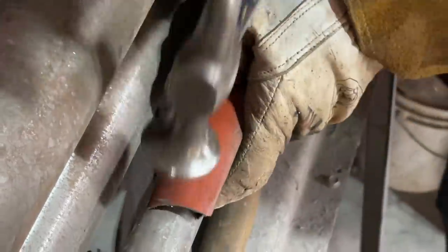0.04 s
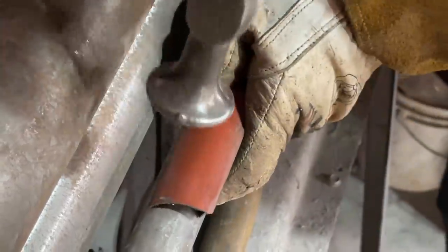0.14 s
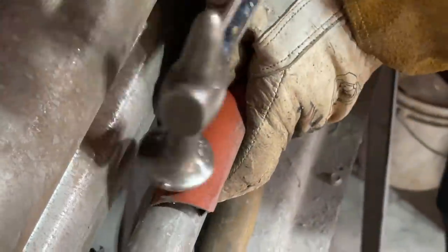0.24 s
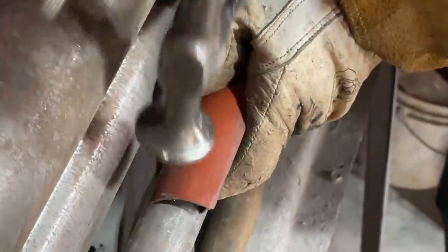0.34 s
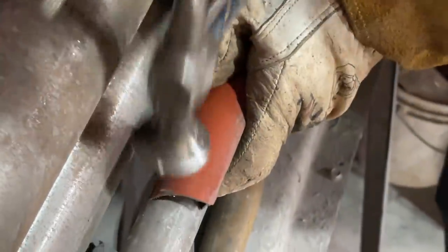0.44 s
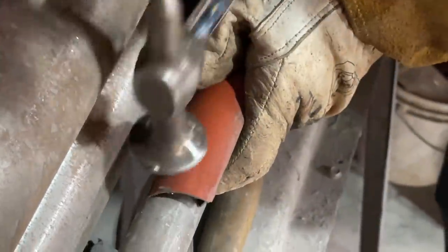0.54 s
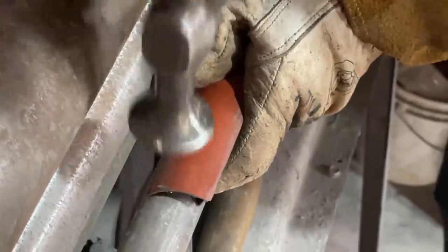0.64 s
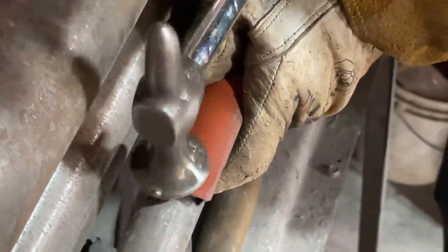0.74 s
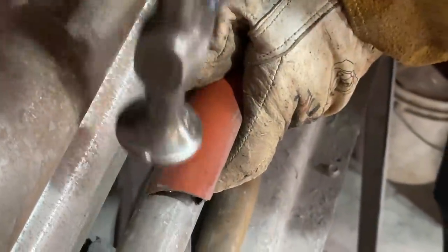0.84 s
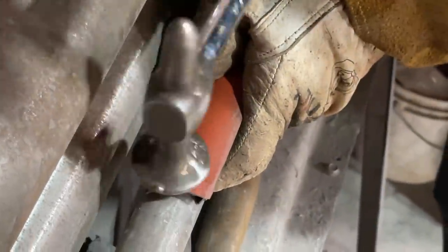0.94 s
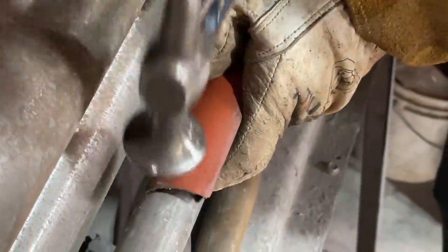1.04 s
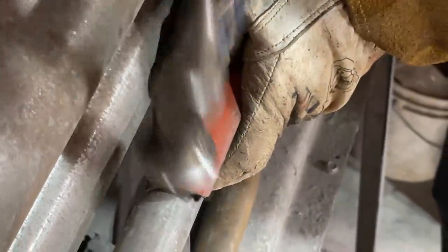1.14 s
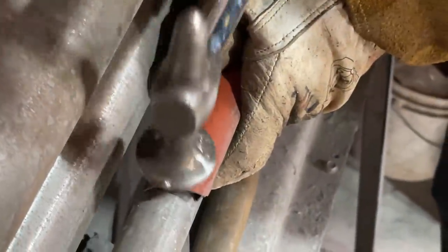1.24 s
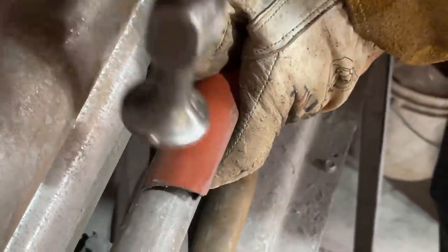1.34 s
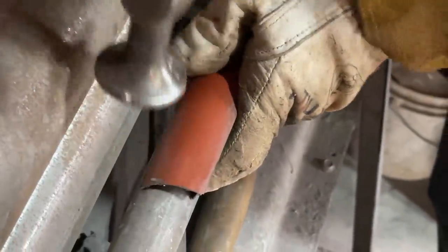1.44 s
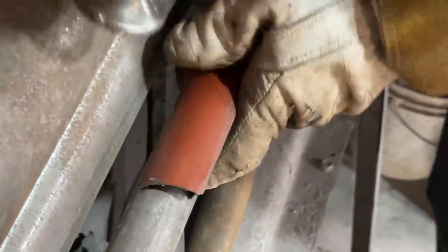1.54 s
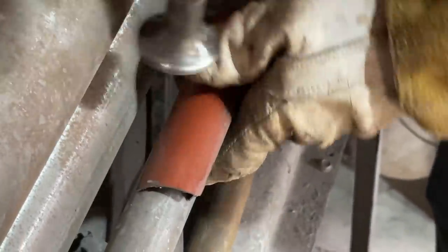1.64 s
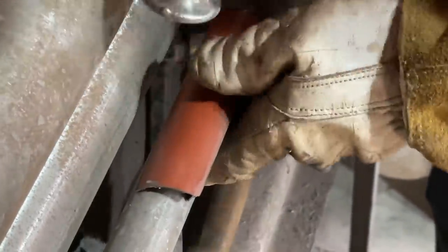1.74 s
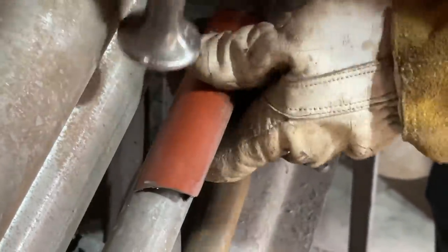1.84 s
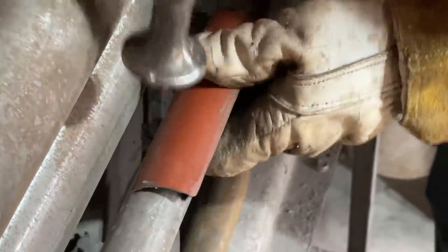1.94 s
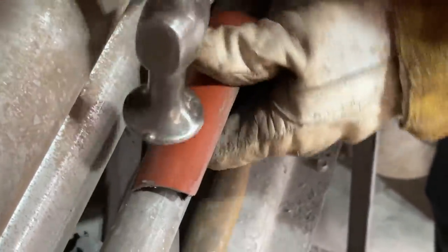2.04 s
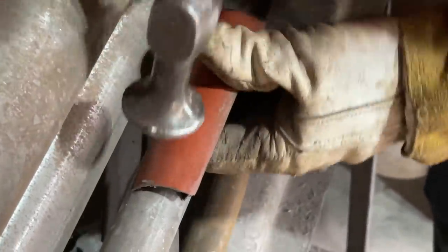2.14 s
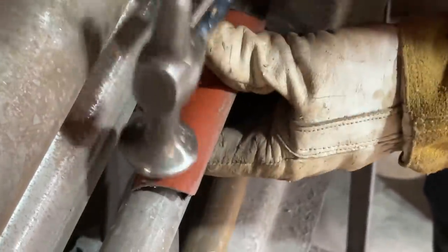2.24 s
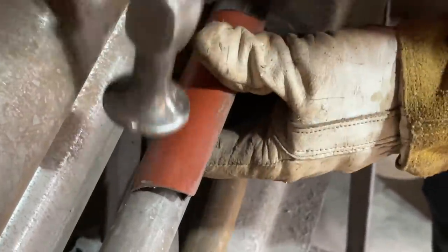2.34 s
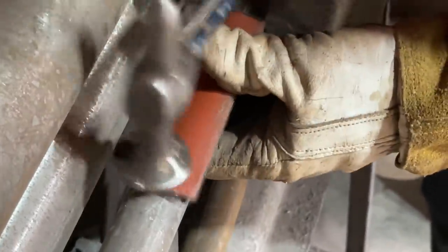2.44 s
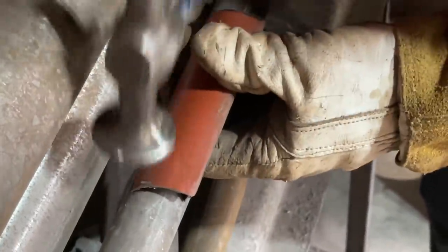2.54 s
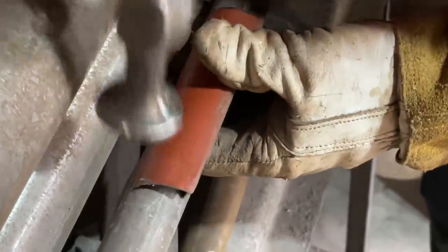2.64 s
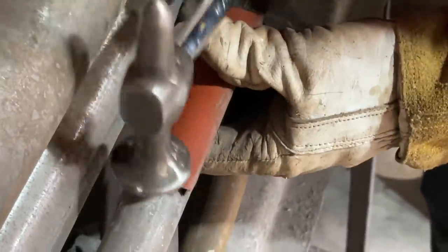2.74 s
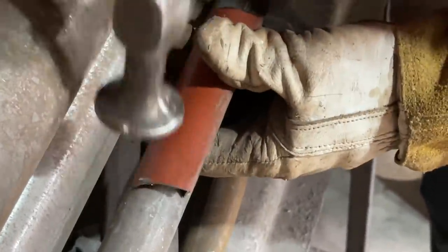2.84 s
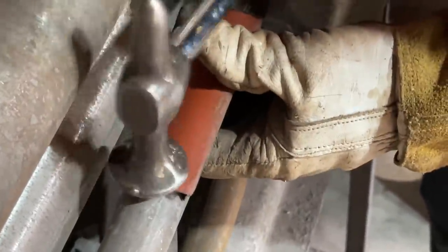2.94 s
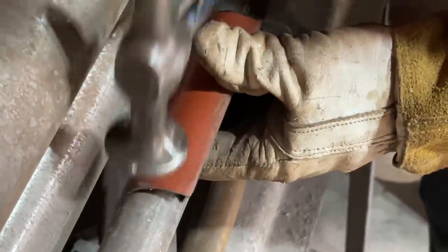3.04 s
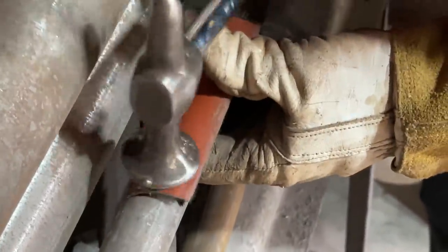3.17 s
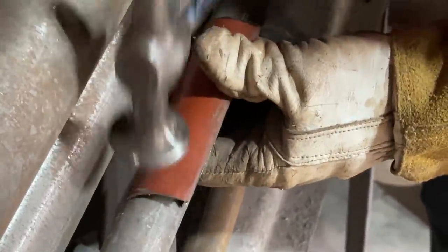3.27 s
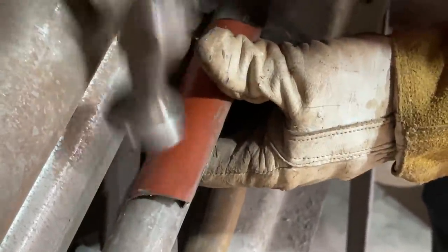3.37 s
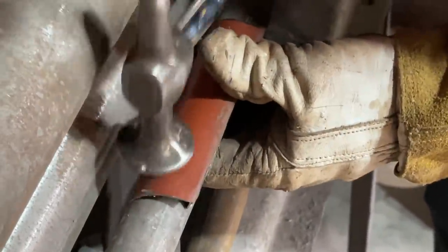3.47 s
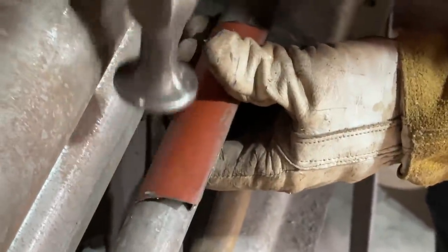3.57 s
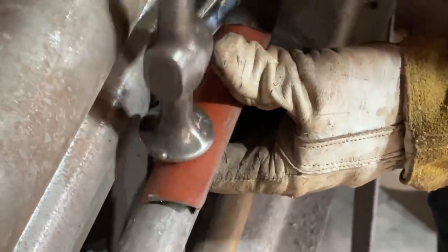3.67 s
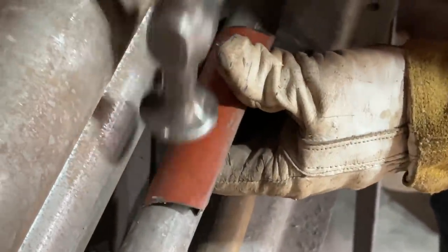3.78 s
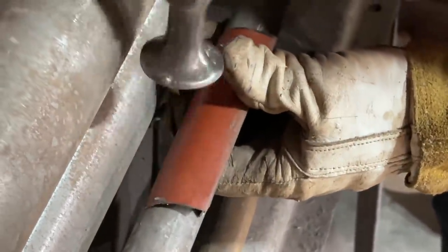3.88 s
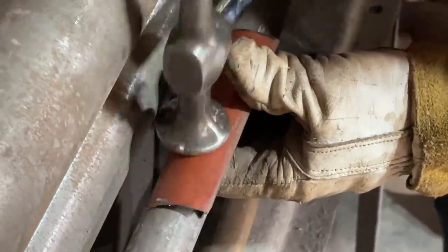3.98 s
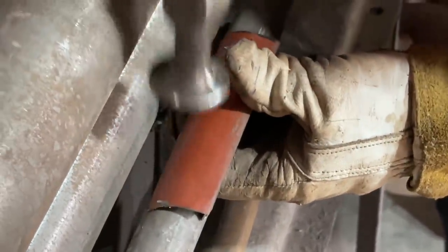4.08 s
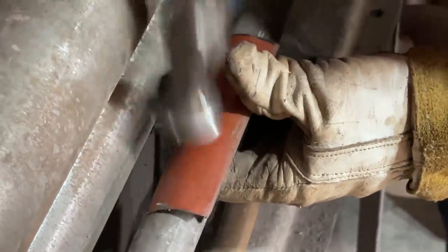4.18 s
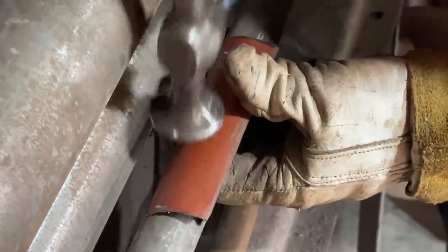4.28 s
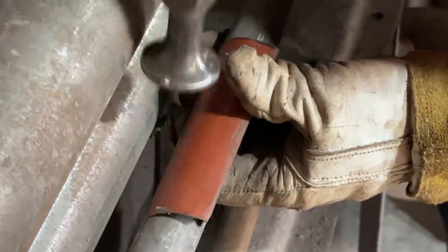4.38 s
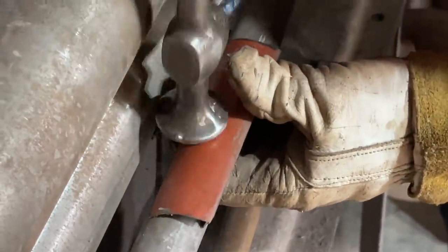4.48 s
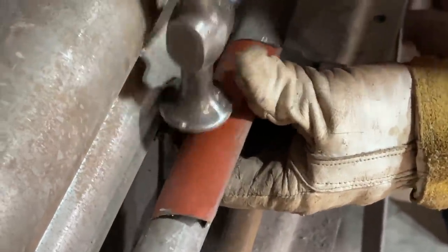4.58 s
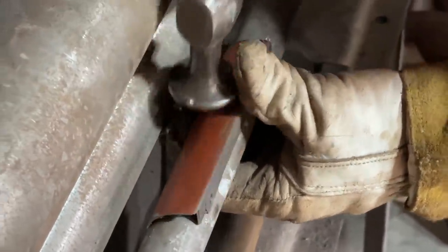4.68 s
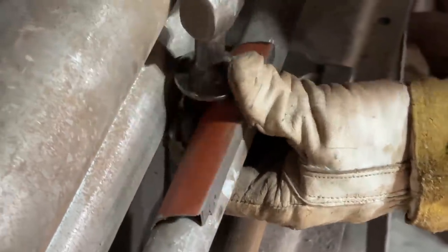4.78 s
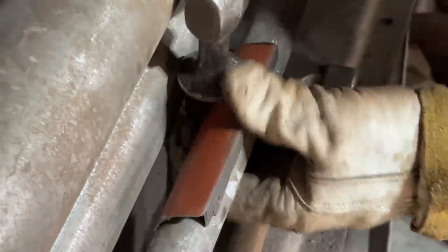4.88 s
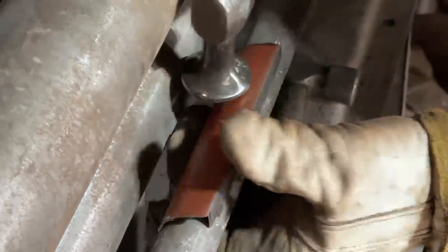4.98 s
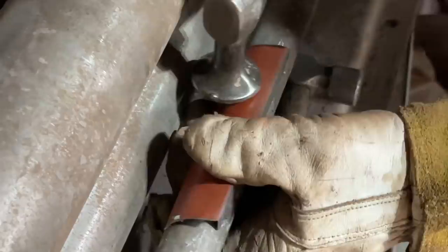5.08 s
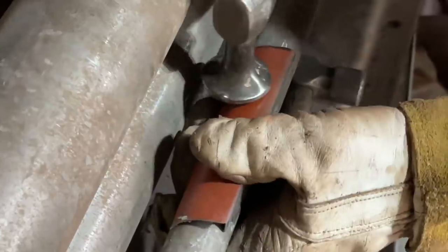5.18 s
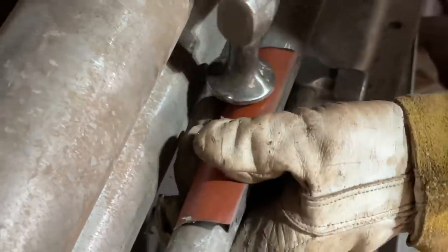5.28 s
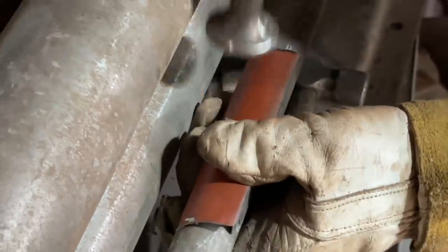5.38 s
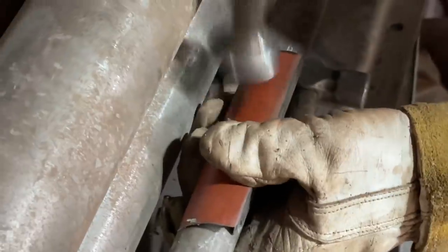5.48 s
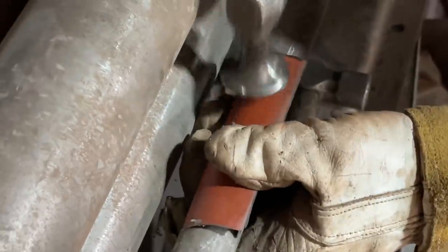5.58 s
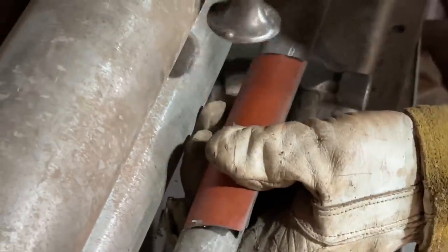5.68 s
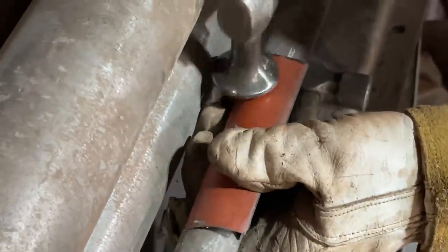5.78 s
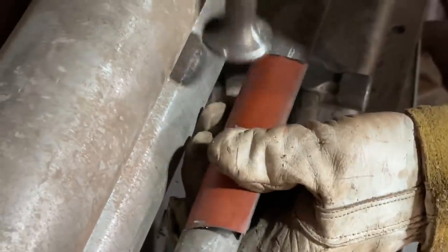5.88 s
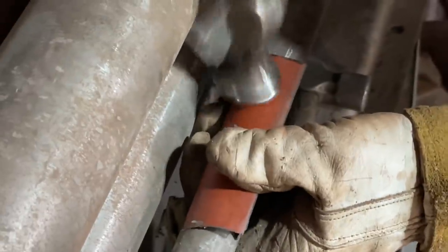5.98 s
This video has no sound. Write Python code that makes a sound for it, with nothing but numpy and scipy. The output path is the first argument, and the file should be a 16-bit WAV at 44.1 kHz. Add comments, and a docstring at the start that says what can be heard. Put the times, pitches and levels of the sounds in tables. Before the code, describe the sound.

A hammer strikes a hand-held steel strip on a steel pipe, about four hard, clanky blows a second. After six blows the glove rustles and the strip ticks during a one-second pause; ten brighter, louder blows follow, then a weak tap, a quieter gap and three final blows. Close microphone, short diffuse workshop echo, dull air bumps and faint hiss.

```python
"""Sharp metallic blows ring out in groups, with pauses between: a hammer taps a curved steel strip onto a steel pipe.
Each blow excites damped modes of the hand-held strip, sets the pipe humming and jolts the frame under it.
The workshop answers with diffuse echoes made of decaying noise. A leather glove shifts the strip: ticks and
rustle. Dull puffs of air bump the microphone, over low buffeting and a faint hiss; overload squashes the peaks."""
import sys
import numpy as np
from scipy import signal
from scipy.fft import rfft, irfft, next_fast_len
from scipy.io import wavfile
from scipy.ndimage import map_coordinates

SR = 44100
rng = np.random.default_rng(int(sys.argv[2]) if len(sys.argv) > 2 else 0)


def generate_wav(signal):
    """Clip the signal to [-1, 1] and save it as 16-bit WAV at the path in sys.argv[1]."""
    frames = np.transpose(np.atleast_2d(signal))
    scaled = np.clip(frames, -1, 1) * 32767
    pcm = np.round(scaled).astype(np.int16)
    wavfile.write(sys.argv[1], SR, pcm)


N = 265261

# Blows; grip and strike point move three strip modes and share out the energy. Each row: start in seconds,
# first, third and sixth mode in Hz, levels in dB of the first, second, third and upper modes, rebound in dB
# relative to the blow, then levels in dB of the frame, the pipe and the puff of air.
BLOWS = [(-0.015, 1722, 4690, 8760, -22, -24.5, -25.5, -27, -4, -34, -49.5, -42),
         (0.222, 1770, 4100, 8300, -16, -14, -25, -21.5, -12, -23.5, -34, -37),
         (0.46, 1370, 4390, 8320, -23.5, -18, -25.5, -21, -20, -26, -34.5, -40.5),
         (0.695, 1100, 3640, 8670, -25, -19.5, -37, -31, -14, -30.5, -35.5, -35.5),
         (0.926, 1194, 3830, 8770, -20, -17, -24.5, -25.5, -16, -27, -34, -34.5),
         (1.158, 1340, 3890, 9170, -18.5, -19.5, -29.5, -24.5, -14, -26, -33.5, -36.5),
         (2.219, 1940, 4170, 8080, -18.5, -28.5, -28.5, -24.5, -18, -33, -43, -54.5),
         (2.442, 1810, 4240, 8350, -15, -18, -19.5, -16.5, -15.5, -25, -32, -46),
         (2.693, 1830, 4080, 8270, -13, -19.5, -17.5, -19, -15.5, -25, -36, -42.5),
         (2.932, 1830, 4080, 8630, -12.5, -20, -16.5, -16, -18.5, -22.5, -34, -44),
         (3.174, 1650, 3900, 8340, -13, -18, -23, -14, -19.5, -23, -35, -44),
         (3.408, 1450, 3980, 8740, -19, -23.5, -15.5, -13, -18.5, -20.5, -30.5, -42.5),
         (3.655, 1316, 3820, 9000, -13.5, -24, -14.5, -16.5, -13, -20, -35, -46),
         (3.955, 1390, 4210, 8300, -16, -18, -15, -17.5, -15.5, -19.5, -34.5, -40.5),
         (4.195, 1740, 4220, 8470, -15.5, -21.5, -13.5, -14.5, -16.5, -17.5, -34.5, -43.5),
         (4.43, 1870, 4230, 8200, -15.5, -22, -11, -16, -9, -18.5, -35, -42),
         (4.748, 1700, 4260, 8100, -30, -32, -39.5, -42, -9, -40.5, -70, -56),
         (5.506, 1856, 3800, 8270, -15.5, -19, -15, -15.5, -13.5, -21.5, -39.5, -42.5),
         (5.745, 1900, 4260, 8140, -24, -18, -15, -15, -18, -15.5, -40, -46),
         (5.991, 1650, 4410, 8300, -20.5, -20, -19.5, -18.5, -22, -15.5, -53, -52)]
# Energy of a sound whose rms is 1 over 1/60 s, as an amplitude: it turns a blow's levels into such rms levels.
BLOW_SIZE = np.sqrt(SR / 60)


def amp(db):
    """Decibels to amplitude ratio: 20 dB is a factor of ten."""
    return 10 ** (np.asarray(db) / 20)


def unit(x):
    """Normalisation to an rms of 1."""
    return x / np.sqrt(np.mean(x ** 2) + 1e-20)


def along(points, hz):
    """Interpolation of (Hz, value) points on a logarithmic frequency axis."""
    f, v = np.transpose(points)
    return np.interp(np.log(hz + 1), np.log(f + 1), v)


def curve(rows):
    """Linear interpolation of (seconds, value) rows, one value per sample."""
    return np.interp(np.arange(N) / SR, *np.transpose(rows))


def wobble(rate):
    """Slow random modulation: a smooth curve through `rate` random knots a second."""
    knots = rng.standard_normal(int(N * rate / SR) + 4)
    return map_coordinates(knots, [np.arange(N) * rate / SR])


def filtered(x, response):
    """Linear filtering: the spectrum of x times a complex response of frequency."""
    m = next_fast_len(x.shape[-1] + 8192)  # padding keeps the tail from wrapping round
    spectrum = rfft(x, m) * response(np.fft.rfftfreq(m, 1 / SR))
    return irfft(spectrum, m)[..., :x.shape[-1]]


def noise(spectrum):
    """Coloured noise: white noise shaped by a (Hz, dB) spectrum, at rms 1."""
    return unit(filtered(rng.standard_normal(N), lambda hz: amp(along(spectrum, hz))))


def resonance(x, hz, width_hz, order=1):
    """Damped oscillator driven by x (order 2: steeper flanks), scaled to energy 1."""
    def response(f):
        damping = 1j * f * width_hz
        return (damping / (hz * hz - f * f + damping)) ** order

    y = filtered(x, response)
    return y / np.linalg.norm(y)


def add(track, s, sound):
    """Superposition: mix a sound into the track at s seconds, cut at both ends."""
    i = round(s * SR)
    part = sound[max(-i, 0):max(len(track) - i, 0)]
    track[max(i, 0):][:len(part)] += part


def echoes(colour, slow):
    """Diffuse reverberation: fresh noise of energy 1 in which each frequency decays at its own rate."""
    # Each row: frequency in Hz, relative decay time, which times `slow` gives the seconds to fall 60 dB.
    decay = [(200, 0.55), (700, 1), (1800, 0.84), (4500, 0.52), (8000, 0.46), (12000, 0.34), (14000, 0.26),
             (16000, 0.34)]
    hz, t, z = signal.stft(rng.standard_normal(SR * 3 // 4), SR, nperseg=256)
    t60 = slow * along(decay, hz)[:, None]
    level_db = along(colour, hz)[:, None] - 60 * t / t60
    tail = signal.istft(z * amp(level_db), SR, nperseg=256)[1]
    return tail / np.linalg.norm(tail)


def hiss():
    """Steady broadband noise: the quiet shop."""
    # Each row: frequency in Hz, relative level in dB per Hz.
    air = [(150, -5.5), (400, 1), (1000, -8.5), (2000, -6.5), (4000, -11.5), (8000, -15.5), (11000, -19.5),
           (16000, -23.5)]
    return amp(-68.5) * noise(air)


def buffeting():
    """Turbulent air and handling at the microphone: low noise that swells after every blow."""
    # Level between puffs. Each row: time in seconds, level in dB.
    rumble = [(0, -55), (1.37, -50.5), (1.54, -45), (1.69, -47), (1.77, -56.5), (2.2, -52.5), (4.65, -57.5),
              (4.99, -48), (5.06, -62), (5.24, -54), (6.01, -53)]
    # Its spectrum. Each row: frequency in Hz, relative level in dB per Hz.
    low = [(15, -4), (30, -0.5), (70, -7.5), (120, -20.5), (200, -98.5)]
    puff_s = 0.05  # the pushed air peaks at the microphone this long after a blow
    level = amp(curve(rumble))
    u = np.arange(SR // 2) / SR / puff_s
    for s, *_, puff_db in BLOWS:
        add(level, s, amp(puff_db) * (u * np.exp(1 - u)) ** 2)
    return level * unit(amp(4.4 * wobble(9.2)) * noise(low))


def air_bumps():
    """Low-frequency pressure pulses: each dull puff of air bumps the microphone for about one cycle."""
    # Each row: start in seconds, approximate peak level in dB, frequency in Hz.
    bumps = [(1.323, -43, 248), (1.508, -37, 103), (1.526, -31, 65), (1.653, -32.5, 199), (1.736, -37, 147),
             (2.377, -25.5, 105), (3.83, -30, 232), (4.631, -26, 128), (4.874, -24.5, 124),
             (4.918, -33.5, 202), (4.965, -30, 115), (5.37, -50.5, 149.7)]
    out, t = np.zeros(N), np.arange(SR // 10) / SR
    for s, db, hz in bumps:
        cycles = hz * t
        swell = cycles * np.exp(-1.2 * cycles ** 2)
        # 7.5 dB makes up for the low peak of the swell
        add(out, s, amp(db + 7.5) * swell * np.sin(2 * np.pi * (cycles + 0.037)))
    return out


def leather_rub():
    """Friction noise: leather dragged over metal slips in uneven grains, in a dull and a bright band."""
    # Steady dull rub. Each row: time in seconds, level in dB.
    shuffle = [(0, -56), (.89, -54), (1.4, -51), (1.76, -63.5), (1.82, -68.5), (2.2, -62), (2.35, -59.5),
               (3.3, -56), (4.4, -57), (5.0, -62.5), (5.07, -68), (6.01, -60.5)]
    # Strokes. Each row: middle in seconds, half length in seconds, dull level in dB, bright level in dB.
    strokes = [(1.482, 0.045, -41, -68), (1.576, 0.028, -53, -62), (1.658, 0.026, -44, -73),
               (1.733, 0.029, -51.5, -78), (1.999, .07, -70, -69), (2.38, 0.043, -58, -82),
               (3.814, .04, -53, -78), (4.615, 0.036, -47, -54), (4.688, 0.018, -58, -56),
               (4.795, 0.023, -58, -60), (4.943, 0.054, -57, -59), (5.051, .025, -74, -60.5),
               (5.125, 0.027, -68, -67), (5.35, .04, -72, -80)]
    # Spectra of the two bands. Each row: frequency in Hz, relative level in dB per Hz.
    dull_colour = [(50, -33), (110, 4), (250, -0.5), (600, -8.5), (1500, -21), (4000, -36.5), (8000, -68.5)]
    bright_colour = [(800, -20.5), (2500, -1), (5000, -7.5), (7500, -4), (10000, -14), (12500, -23.5),
                     (16000, -26.5)]
    rest_db = -77.5  # bright band between strokes
    middle, half, dull_db, bright_db = np.transpose(strokes)
    swells = np.exp(-((np.arange(N)[:, None] / SR - middle) / half) ** 2)
    dull_grains = unit(amp(2.5 * wobble(40) + 3 * wobble(200)) * noise(dull_colour))
    bright_grains = unit(amp(2.5 * wobble(60)) * noise(bright_colour))
    dull = (amp(curve(shuffle)) + swells @ amp(dull_db)) * dull_grains
    bright = (amp(rest_db) + swells @ amp(bright_db)) * bright_grains
    return dull + bright


def strip_ticks():
    """Broad resonances struck lightly: the strip ticks on the pipe, and damping ends each tick at once."""
    # Each row: start in seconds, peak level in dB, frequency in Hz, width in Hz.
    ticks = [(1.422, -45, 6260, 2530), (1.473, -40, 1500, 2000), (1.484, -39, 880, 1500),
             (1.522, -40, 1190, 1500), (1.578, -44, 4500, 1000), (1.654, -42, 890, 2500),
             (1.71, -55, 4930, 1010), (1.737, -47, 1480, 4950), (1.76, -54, 5500, 3030),
             (1.8875, -35.5, 5370, 2500), (1.965, -46, 5980, 3470), (1.971, -48, 7000, 3460),
             (1.991, -45, 950, 600), (1.993, -40.5, 3070, 1505), (1.995, -52, 7000, 1980),
             (2.022, -32.5, 4400, 1990), (2.038, -33.5, 2410, 2950), (2.078, -51, 2400, 1200),
             (2.089, -48, 2200, 968), (2.0895, -51, 4400, 1510), (2.187, -57.5, 3500, 2500),
             (4.874, -39, 700, 905), (4.965, -50, 700, 904), (5.053, -43.5, 7500, 2500),
             (5.345, -56, 4940, 1196)]
    out, t = np.zeros(N), np.arange(SR // 10) / SR
    for s, db, hz, width_hz in ticks:
        contact = amp(-60 * t / 0.0024) * rng.standard_normal(len(t))
        tick = resonance(contact, hz, width_hz, order=2)
        add(out, s, amp(db) * tick / np.abs(tick).max())
    return out


def frame_clang():
    """High modal density: the frame's many modes merge into decaying noise, with the bench's jolt below."""
    # Spectra of frame and bench. Each row: frequency in Hz, relative level in dB per Hz.
    clang_colour = [(150, -11), (300, -4.5), (500, 3.5), (750, 3), (1200, 1.5), (2500, 5), (5000, -7)]
    thud_colour = [(60, -26.5), (110, -3.5), (200, -0.5), (330, -13.5), (600, -30)]
    out = np.zeros(N)
    for s, *_, frame_db, _, _ in BLOWS:
        clang = echoes(clang_colour, slow=0.61) + amp(-16) * echoes(thud_colour, slow=0.23)
        onset = 1 - np.exp(-np.arange(len(clang)) / SR / 0.011)
        add(out, s, amp(frame_db) * BLOW_SIZE * clang * onset)
    return out


def pipe_hum():
    """Modal superposition: decaying sinusoids whose strengths shift as the strike point travels along the pipe."""
    # Long modes of the pipe. Each row: frequency in Hz, relative level in dB, time to fall 60 dB in seconds,
    # change of level in dB per second of the scene.
    pipe = [(352.6, -17.5, 0.99, 2), (533, -6.5, 0.32, -3), (634, -23.5, 1, 3.5), (698, -10.5, 0.14, 3.5),
            (811, -7.5, 0.76, 0.5), (971, -9, 0.91, 0), (1073, -13.5, 0.61, 1.5), (1340, -8, .5, 1.5),
            (1390, -18.5, 0.69, 4)]
    # Two faint modes that hang on, same columns.
    linger = [(638, -58, 2.5, 3.5), (4790, -74, 2.5, 3.5)]
    linger_db = -18  # added to the lingering modes, whatever the blow
    out, t = np.zeros(N), np.arange(SR * 3 // 2) / SR
    hz, mode_db, t60, travel_db = np.transpose(pipe + linger)
    decay = amp(mode_db[:, None] - 60 * t / t60[:, None])
    rings = decay * np.exp(2j * np.pi * hz[:, None] * t) * (1 - np.exp(-t / 0.0062))
    for s, *_, pipe_db, _ in BLOWS:
        phases = np.exp(2j * np.pi * rng.random(len(rings)))
        strengths = amp(travel_db * s + rng.normal(0, 0.43, len(rings))) * phases
        strengths *= amp([pipe_db] * len(pipe) + [linger_db] * len(linger))
        add(out, s, np.real(strengths @ rings))
    return out


def chatter(u, t60):
    """Repeated contact: envelope of a force that rises fast from u = 0 and falls 60 dB in t60 seconds."""
    return (u >= 0) * (1 - np.exp(-np.abs(u) / 0.00033)) * amp(-60 * np.abs(u) / t60)


def shop_answer(ring):
    """Reverberation as convolution: near benches answer briefly, the far walls for long."""
    # Colour of the echoes. Each row: frequency in Hz, relative level in dB.
    walls = [(300, 8.5), (1500, -4.5), (3000, -4), (5500, 0.5), (8500, -9.5), (12000, -2.5), (15000, -10)]
    room = echoes(walls, slow=0.93) + amp(0.5) * echoes(walls, slow=0.23)
    return amp(-15) * signal.fftconvolve(ring, room)


def struck_strip():
    """Contact damping: modes are broad under the hammer, sharper once free; the shop returns the freed ring."""
    # Modes of the strip. Each row: frequency at rest in Hz, width under the hammer in Hz, width once free in Hz,
    # level within its group in dB.
    modes = [(1420, 790, 390, -1), (3038, 650, 720, 0), (4162, 780, 340, -1), (5400, 1700, 1500, -8.5),
             (6660, 1700, 600, -7.5), (8410, 2000, 1300, -0.5), (10630, 4300, 700, -12.5),
             (13100, 8200, 3000, -16)]
    spring_back = .42  # share of the way back to its rest pitch that the lowest mode slips once free
    mode_scatter, upper_scatter_db = .03, 2.5  # spread between blows: share of frequency, upper levels
    slap_s, slap_db = .044, -27  # one wall throws the crack straight back
    rest_hz, broad_hz, sharp_hz, group_db = np.transpose(modes)
    out, short = np.zeros(N), np.arange(SR // 10) / SR
    kick = 1. * (short == 0)
    for s, pressed_hz, third_hz, sixth_hz, low_db, second_db, third_db, upper_db, rebound_db, *_ in BLOWS:
        upper_dbs = rng.normal(upper_db, upper_scatter_db, len(modes) - 3)
        gains = BLOW_SIZE * amp(group_db + [low_db, second_db, third_db, *upper_dbs])
        higher = rest_hz[1:] * (1 + mode_scatter * rng.standard_normal(len(modes) - 1))
        higher[[1, 4]] = third_hz, sixth_hz
        freed_hz = pressed_hz + spring_back * (rest_hz[0] - pressed_hz)
        # the loose strip chatters against the pipe, lifts and lands again 7 ms later
        force = chatter(short, .018) + amp(rebound_db) * chatter(short - .007, .025)
        rattle = np.zeros(len(short))
        for hz, broad, gain in zip([pressed_hz, *higher], broad_hz, gains):
            contact = force * rng.standard_normal(len(short))
            rattle += gain * resonance(contact, hz, broad, order=2)
        # the ring that reaches the walls, neighbouring modes in opposite sign
        ring = np.zeros(len(short))
        for k, (hz, broad, sharp, gain) in enumerate(zip([freed_hz, *higher], broad_hz, sharp_hz, gains)):
            mode = resonance(kick, hz, sharp, order=2) + .5 * resonance(kick, hz, broad)
            ring += (-1) ** k * gain * mode
        add(out, s, rattle)
        add(out, s + slap_s, amp(slap_db) * rattle)
        add(out, s + 0.0037, shop_answer(ring))
    return out


def scene():
    """Superposition of background, glove and hammer blows in one channel."""
    background = hiss() + buffeting() + air_bumps()
    glove = leather_rub() + strip_ticks()
    hammer = frame_clang() + pipe_hum() + struck_strip()
    return (background + glove + hammer)[None]


def record(dry):
    """Saturation and band limiting: peaks flatten towards 0.98, and the treble fades out."""
    top_hz = 16550  # nothing is kept above; the fade takes the 700 Hz below
    clipped = dry / (1 + np.abs(dry / .98) ** 8) ** (1 / 8)
    return filtered(clipped, lambda hz: np.clip((top_hz - hz) / 700, 0, 1))


dry = scene()
out = record(dry)
generate_wav(out)
```